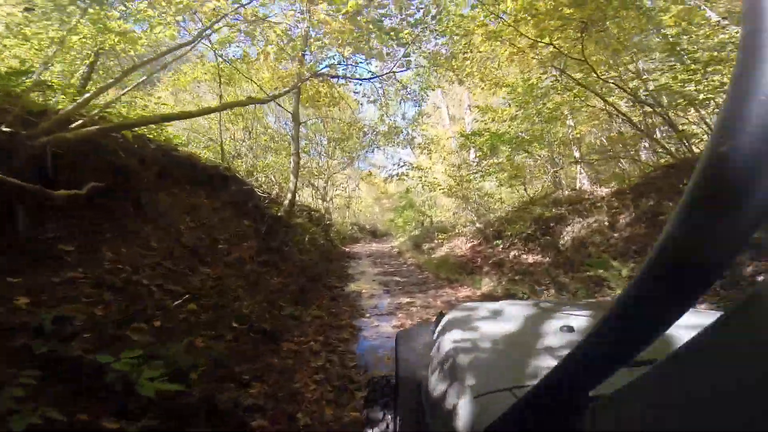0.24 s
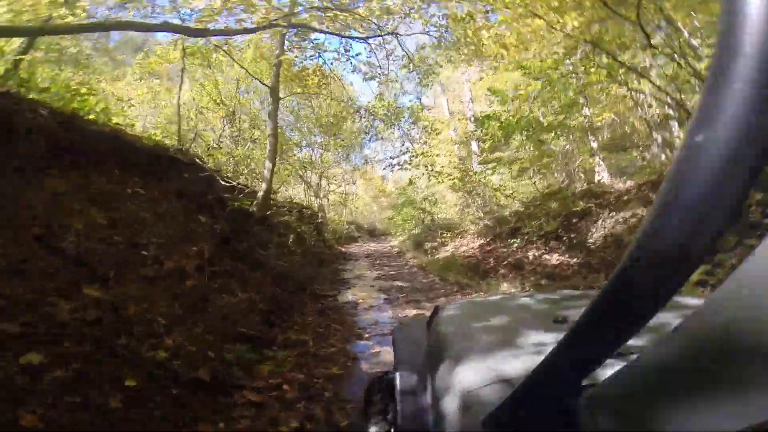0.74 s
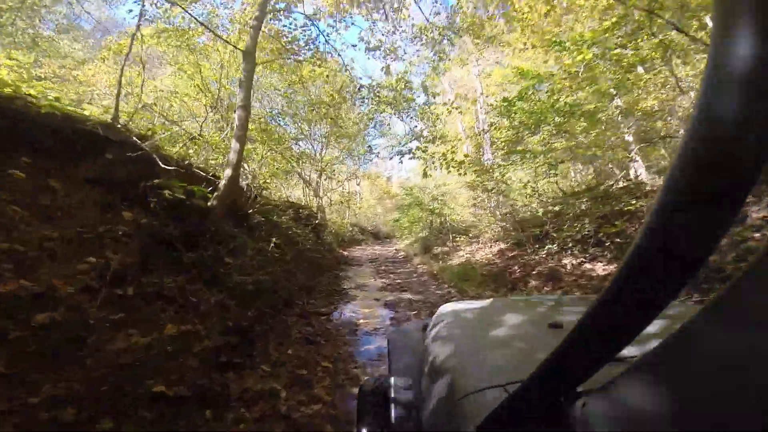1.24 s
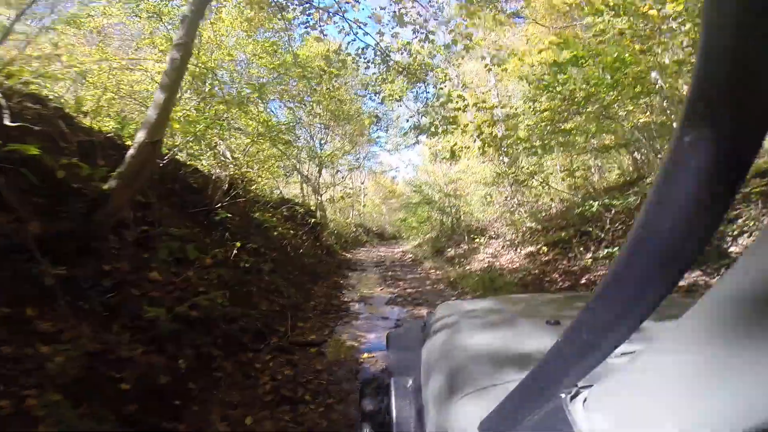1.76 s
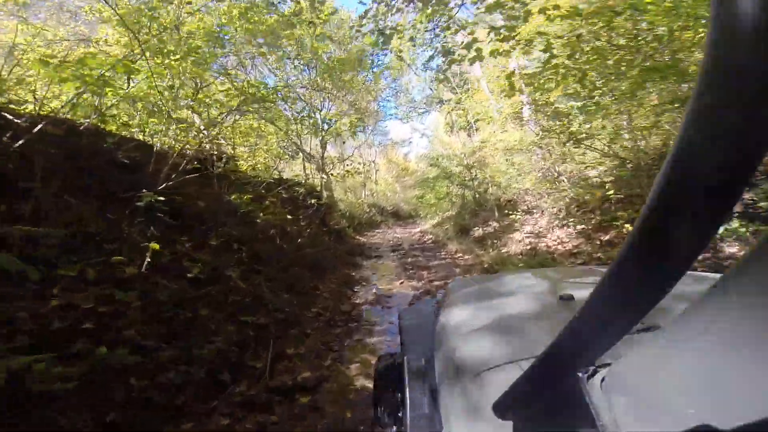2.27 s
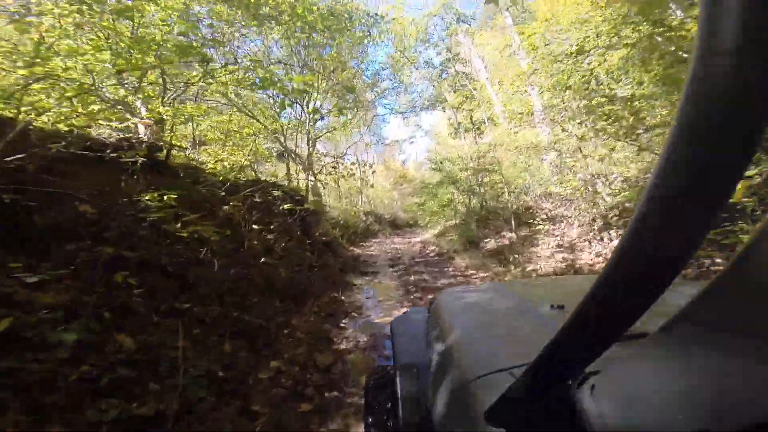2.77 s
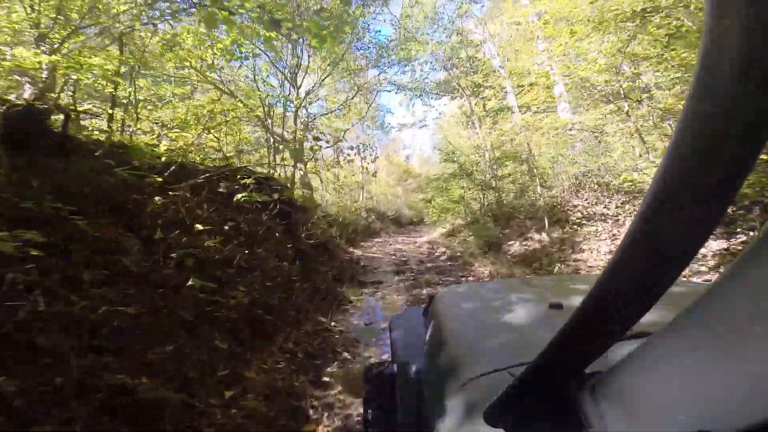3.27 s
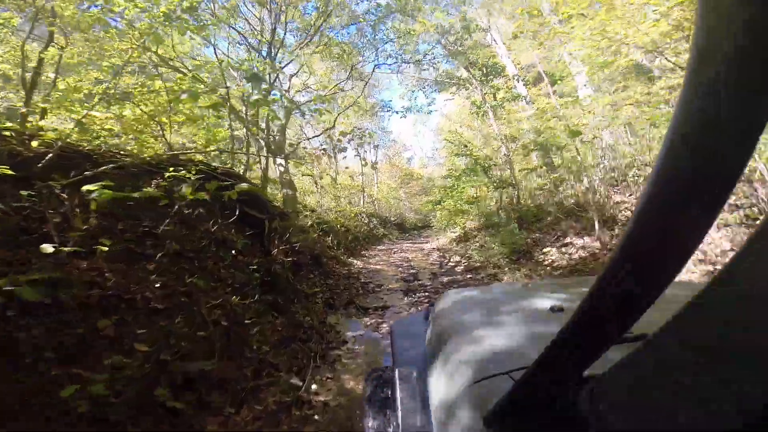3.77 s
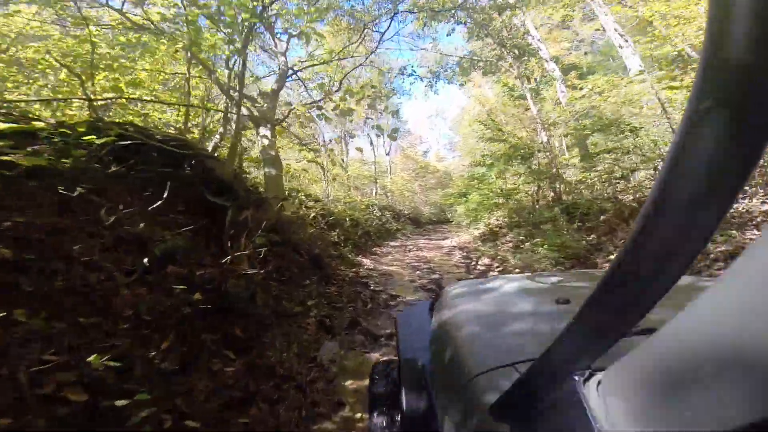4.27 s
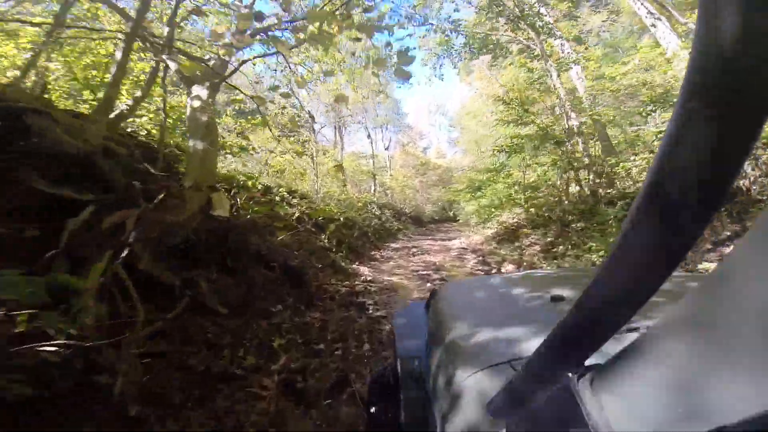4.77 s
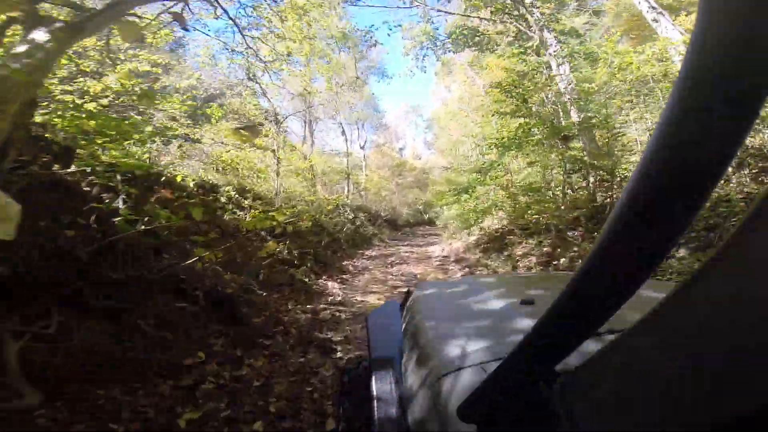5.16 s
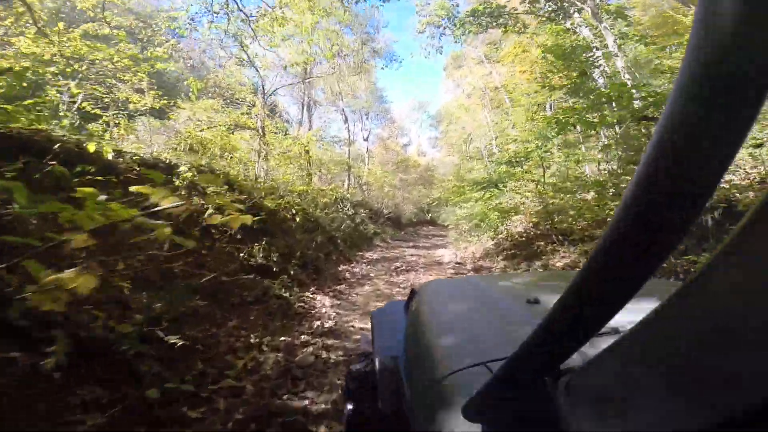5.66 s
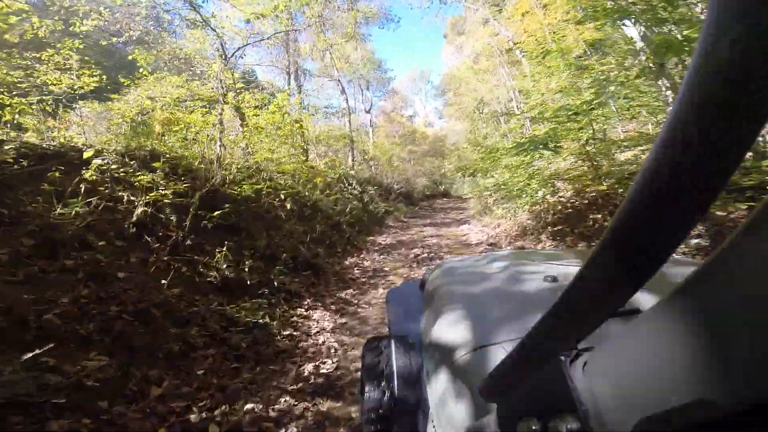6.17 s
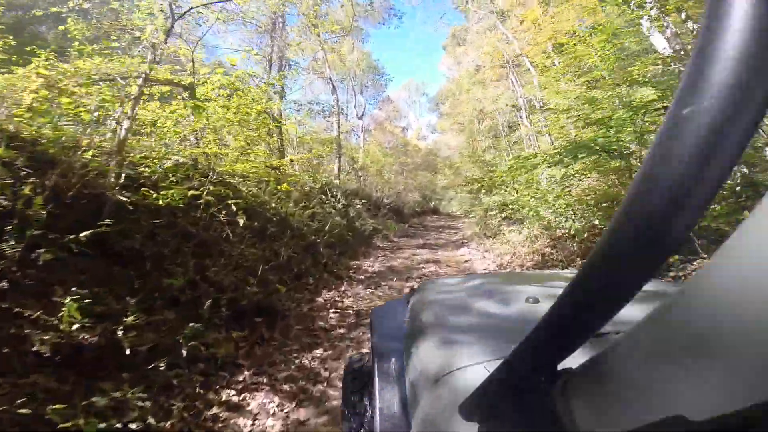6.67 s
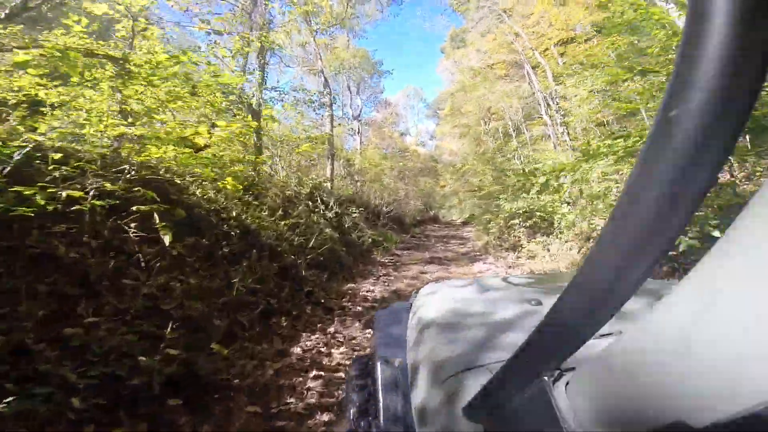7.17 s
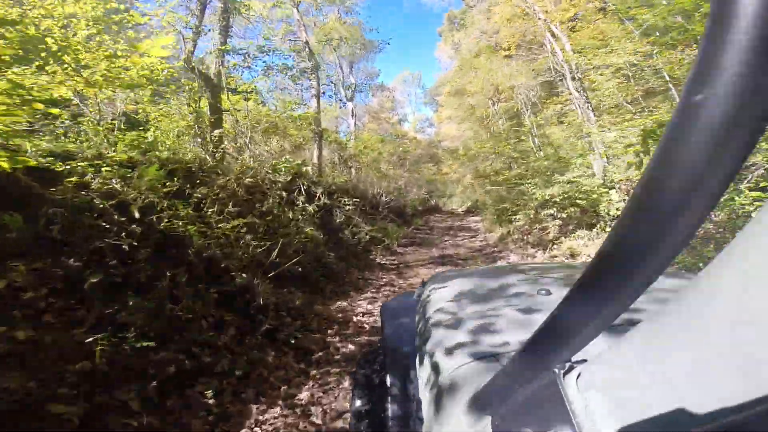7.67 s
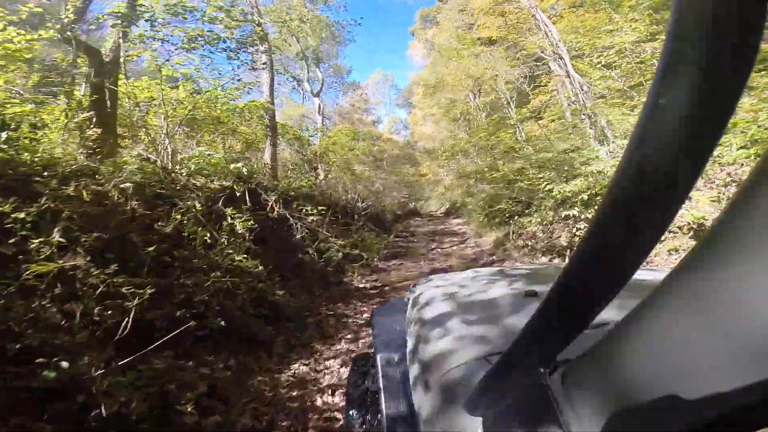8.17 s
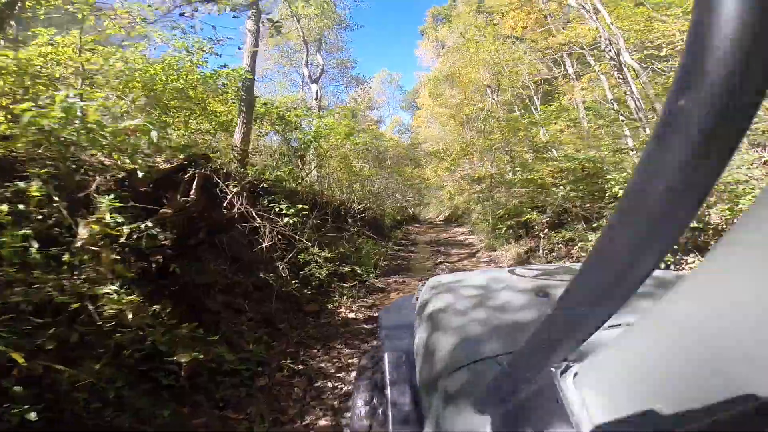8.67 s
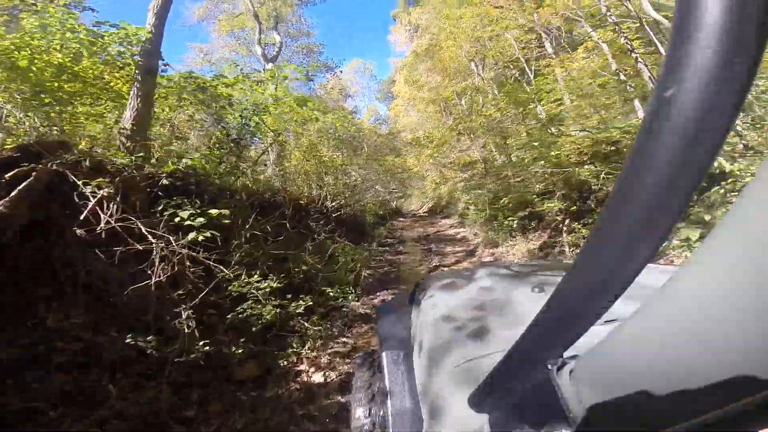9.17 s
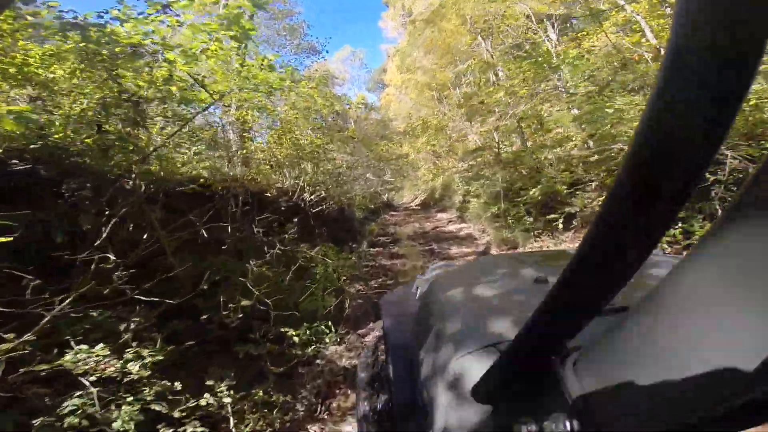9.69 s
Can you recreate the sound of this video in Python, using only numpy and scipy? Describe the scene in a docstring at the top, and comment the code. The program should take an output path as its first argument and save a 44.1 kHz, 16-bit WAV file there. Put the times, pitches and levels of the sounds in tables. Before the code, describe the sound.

Close, muffled outdoor sound from a case bolted on a slow vehicle. Quiet leaf rustle and low engine throb at first, an early stick snap, clusters of small hollow ticks, then stronger rolling crackle and chassis rumble. Two twig strikes just after five seconds are by far the loudest. Later come bumps, wet pops, faint thin metal rings and more crunching over steady faint hiss.

```python
"""Off-road vehicle on a muddy woodland trail

A four-wheel-drive vehicle crawls along, heard by a cased camera bolted to its body. Low engine orders hum,
a faint higher order shows briefly, the mount swings and shakes in noise bands. Tyres hiss and crunch as shaped
noise over mud and wet leaves; pops are short rising tones, snaps ringing modes. The case ticks, twigs strike it
as pushes and brief rings, a loose metal part rings thinly under noise rubs, over a steady microphone hiss."""
import sys
import numpy as np
from scipy import signal
from scipy.fft import rfft, irfft
from scipy.io import wavfile
from scipy.ndimage import uniform_filter1d

SR = 44100
rng = np.random.default_rng(int(sys.argv[2]) if len(sys.argv) > 2 else 0)


def pcm_store(signal):
    """Save signal as 16-bit PCM."""
    levels = np.round(np.clip(np.atleast_2d(signal), -1, 1) * 32767)
    wavfile.write(sys.argv[1], SR, levels.astype(np.int16).T)


N = 437913

# tyres rolling on wet leaves: (time [s], level [dB])
ROLLING = [(0.0, -54.5), (.6, -52.5), (2.16, -47), (3.59, -47), (4.06, -45), (4.42, -48.5), (5.25, -46),
           (5.97, -50.5), (6.44, -46.5), (6.72, -50), (7.11, -46), (7.69, -50), (7.88, -46.5),
           (9.62, -46.5), (9.93, -45)]
# outside sound as it passes the case: (frequency [Hz], relative level [dB])
CASE = [(150, 0), (400, -4), (650, -5), (1090, -3), (1380, 0), (1770, -1), (2070, -7), (2700, 3),
        (3100, -5.5), (3600, -14), (4500, -12), (6500, -16.5), (9000, -29.5), (12000, -35.5), (15500, -47)]


def gain_of(db):
    """dB to amplitude gain; gain_of(2 * db) is power."""
    return 10 ** (np.asarray(db) / 20)


def evened(x):
    """Scales to rms 1."""
    return x / np.sqrt(np.mean(x ** 2) + 1e-20)


def columns(rows):
    """Interpolates each value column of a time table to every sample."""
    time_s, *values = np.transpose(rows)
    return [np.interp(np.arange(N) / SR, time_s, value) for value in values]


def coloured(x, points):
    """Filters by a spectrum of (frequency [Hz], level [dB]) points."""
    point_hz, point_db = np.transpose(points)
    hz = np.fft.rfftfreq(len(x), 1 / SR)
    spectrum_db = np.interp(np.log(hz + 1), np.log(point_hz + 1), point_db)
    return irfft(rfft(x) * gain_of(spectrum_db), len(x))


def add(mix, start_s, sound):
    """Mixes a sound in at a time, cut at the end of the mix."""
    part = mix[round(start_s * SR):][:len(sound)]
    part += sound[:len(part)]


def drift(top_hz):
    """Slow random wander of rms 1: 24 sines over the three octaves up to top_hz."""
    t = np.arange(0, N, 256) / SR
    waves = sum(np.sin(2 * np.pi * (hz * t + rng.random())) / np.sqrt(hz)
                for hz in np.geomspace(top_hz / 8, top_hz, 24))
    return np.interp(np.arange(N) / SR, t, evened(waves))


def swells(rows, half_s):
    """Sums bell-shaped swells of power at (time [s], level [dB]); half_s is the 1/e half width."""
    t = np.arange(0, N, 128) / SR
    power = sum(gain_of(2 * db) * np.exp(-((t - s) / half_s) ** 2) for s, db in rows)
    return np.interp(np.arange(N) / SR, t, power)


def engine():
    """Low orders of the firing rate, wavering in common pitch and separate levels."""
    # (time [s], firing rate [Hz], level [dB])
    engine_curve = [(0, 45.24, -38.5), (.7, 40.1, -28.5), (.9, 37.4, -33), (1.1, 35.1, -28),
                    (1.5, 36.6, -36), (1.65, 38.2, -49), (1.8, 40.08, -29), (2.3, 38.9, -31.5),
                    (2.45, 39.73, -34), (2.9, 38.9, -28.5), (3.2, 40.06, -39.5), (3.7, 40.73, -33),
                    (4, 39.06, -45), (4.3, 42.8, -32.5), (4.7, 40.95, -38), (5.3, 40.05, -38.5),
                    (5.8, 39.02, -33), (6.1, 38.9, -40), (6.3, 39.06, -28.5), (6.9, 39.97, -37),
                    (7.2, 40.96, -41), (7.55, 40, -29), (8.5, 39.97, -32.5), (9.1, 40.96, -26.5),
                    (9.3, 40.04, -40), (9.5, 39.96, -32), (9.93, 39, -32.5)]
    # (multiple of the firing rate, relative level [dB])
    orders = [(1, -3), (1.5, -16.5)]
    firing_hz, level_db = columns(engine_curve)
    turns = np.cumsum(firing_hz * (1 + 0.022 * drift(11))) / SR
    out = np.zeros(N)
    for multiple, order_db in orders:
        gain = np.sqrt(2) * gain_of(level_db + order_db + 2.5 * drift(10))
        out += gain * np.sin(2 * np.pi * (multiple * turns + rng.random()))
    return out


def higher_engine_orders():
    """Faint third or fourth order of the firing rate, heard briefly as a sine that swells and fades."""
    # (start [s], length [s], from [Hz], to [Hz], level at mid-length [dB])
    order_lines = [(.05, 0.49, 140.9, 121.3, -61), (.9, 0.6, 141, 142, -56.5)]
    out = np.zeros(N)
    for s, length_s, from_hz, to_hz, db in order_lines:
        u = np.arange(0, 1, 1 / (length_s * SR))
        turns = np.cumsum(from_hz + (to_hz - from_hz) * u) / SR
        add(out, s, gain_of(db) * np.sqrt(2 * np.sin(np.pi * u)) * np.sin(2 * np.pi * turns))
    return out


def mount():
    """Two bracket modes beat in a wide sway; trail and bumps rumble in the chassis and thud above it."""
    # mount swinging on its bracket: (time [s], swing rate [Hz], level [dB])
    swing_curve = [(0, 15, -36), (.4, 17.1, -30.5), (.72, 14.9, -43), (1.35, 12.5, -29), (1.55, 17, -36.5),
                   (2.1, 14, -22.5), (2.46, 15.5, -33), (2.9, 15.5, -21), (3.15, 17, -35.5),
                   (3.45, 15.4, -24.5), (3.65, 15, -29.5), (3.9, 18.9, -24), (4.25, 17.7, -23.5),
                   (4.51, 16.1, -30.5), (4.98, 17.1, -22), (5.34, 15, -37.5), (5.45, 14.6, -19),
                   (5.67, 17, -25.5), (5.95, 18, -17), (6.25, 16, -32), (6.44, 18.2, -20), (6.64, 17, -32),
                   (6.92, 14, -26), (7.44, 14.9, -29), (7.9, 17.9, -23), (8.3, 19.3, -32.5),
                   (8.7, 18.8, -25), (8.95, 15, -33.5), (9.09, 15, -24), (9.26, 15, -36.5),
                   (9.45, 17.6, -19.5), (9.93, 18, -32.5)]
    # trail roughness felt in the chassis: (time [s], rumble level [dB], thud level [dB])
    trail = [(0, -56, -48.5), (.8, -47, -55), (1.3, -49, -52), (2, -52, -49), (2.4, -45.5, -54.5),
             (4.8, -39, -53), (5.2, -37, -51), (6.4, -40.5, -48), (6.8, -40.5, -51), (7.1, -40, -53),
             (9.93, -41, -50.5)]
    # single bumps under the wheels: (peak time [s], rumble level [dB], thud level [dB])
    bumps = [(.86, -43, -42.5), (1.36, -46, -48), (3.4, -44, -59), (3.62, -36, -52), (3.84, -30, -43.5),
             (4.03, -33, -48.5), (4.47, -37, -62), (5.45, -35.5, -43.5), (5.608, -30, -54),
             (5.84, -32.5, -45.5), (6.03, -41, -42.5), (6.42, -22.5, -46), (6.61, -38, -60),
             (8.03, -41, -47), (8.5, -33, -64), (8.68, -33, -48.5), (8.89, -53, -43.5), (9.33, -33, -53),
             (9.62, -31, -45)]
    # spectra of sway, chassis rumble and thud: (frequency [Hz], relative level [dB])
    sway_colour = [(2, -6), (8, 9), (29, 8.5), (38, 2), (50, 5), (80, -54), (400, -92)]
    chassis_colour = [(30, -4), (48, 1.5), (66, 4), (90, -7.5), (115, -19), (200, -75), (800, -90)]
    thud_colour = [(60, -5.5), (95, 0.5), (160, -5), (300, -17.5), (600, -26.5), (1200, -29.5), (4000, -84)]
    upper_ratio, upper_db = 1.26, -9  # second bracket mode relative to the first
    sway_db, swing_ref_db, sway_follows = -32, -25, 0.48  # sway level at the reference swing; dB per dB
    bump_half_s, thud_half_s = 0.018, 0.027

    swing_hz, swing_db = columns(swing_curve)
    swing = np.zeros(N)
    for ratio, mode_db in ((1, 0), (upper_ratio, upper_db)):
        gain = np.sqrt(2) * gain_of(swing_db + mode_db + 2.0 * drift(41))
        turns = np.cumsum(ratio * swing_hz * (1 + 0.0568 * drift(3.0))) / SR
        swing += gain * np.sin(2 * np.pi * (turns + rng.random()))

    sway, rumble, thud = (evened(coloured(rng.standard_normal(N) * gain_of(1.16 * drift(23)), colour))
                          for colour in (sway_colour, chassis_colour, thud_colour))
    sway *= gain_of(sway_db + sway_follows * (swing_db - swing_ref_db))
    rumble_db, thud_db = columns(trail)
    bump_s, bump_rumble_db, bump_thud_db = np.transpose(bumps)
    rumble *= np.sqrt(gain_of(2 * rumble_db) + swells(zip(bump_s, bump_rumble_db), bump_half_s))
    thud *= np.sqrt(gain_of(2 * thud_db) + swells(zip(bump_s, bump_thud_db), thud_half_s))
    return swing + sway + rumble + thud


def tyres():
    """Rolling hiss of random short-time spectra; crunches rise fast and fade; small cracks fall at random."""
    # leaves and sticks crushed: (time [s], level [dB], brightness [dB per octave], t60 [s])
    crunches = [(0.0792, -51, 7, 0.16), (0.1775, -46.5, 6.5, 0.27), (.5536, -46, 4, .08),
                (0.638, -42, 6.5, 0.25), (0.967, -42, 5, 0.27), (1.196, -42.5, 5, 0.36),
                (1.6784, -46, 5, 0.18), (1.9614, -45.5, 6.5, 0.26), (2.1021, -43, 6, 0.36),
                (2.568, -45.5, 4.5, 0.52), (2.8523, -45, 3.5, 0.26), (3.1012, -42.5, 3, 0.2),
                (3.2392, -45.5, 5, 0.26), (3.474, -44, 4.5, 0.3), (3.6671, -40, 5.5, 0.25),
                (4.032, -42, 3.5, 0.3), (4.1107, -41.5, 2, 0.16), (4.2753, -42, 2, 0.29),
                (4.5053, -41.5, 5.5, 0.26), (4.74, -44, 2, 0.32), (4.8806, -41.5, 4, 0.33),
                (5.0055, -38.5, 4.5, 0.046), (5.1658, -33.5, 3, 0.19), (5.1844, -35, 3, 0.16),
                (5.3492, -42, 6, 0.2), (5.394, -40, 3, .15), (5.4525, -41, 3, 0.13),
                (5.8107, -40.5, 3, 0.16), (5.8619, -45, 2, 0.18), (5.948, -41.5, 3, 0.081),
                (6.335, -42, 1.5, 0.19), (6.4975, -50, 1, 0.12), (6.6616, -47, -2, 0.081),
                (6.808, -43.5, 3.5, 0.3), (6.975, -51, 7, 0.21), (7.185, -38.5, 2.5, 0.17),
                (7.2654, -53, 8, 0.21), (7.4003, -39, 3.5, 0.089), (7.5082, -40.5, 3, 0.13),
                (7.6575, -42, 4, 0.3), (7.801, -38, 3.5, 0.22), (7.887, -44, 5, 0.091),
                (7.955, -42.5, 3.5, 0.24), (8.147, -45, 1.5, 0.1), (8.8407, -46.5, 6, 0.15),
                (9.0905, -42.5, 5, 0.19), (9.359, -43.5, 0, 0.2), (9.6556, -39.5, 4.5, 0.41)]
    neutral_db, brighter = -51, 0.36  # louder rolling is brighter: dB per octave per dB above neutral
    crunch_rise_s = 0.015
    hop, window = 64, 256
    frames, hz = N // hop + 5, np.fft.rfftfreq(window, 1 / SR)
    t = np.arange(frames) * hop / SR
    octaves = np.log2((hz[:, None] + 300) / 2700)  # zero at 2400 Hz, compressed in the bass

    level_db = np.interp(t, *np.transpose(ROLLING))
    power = gain_of(2 * (level_db + brighter * (level_db - neutral_db) * octaves))
    for s, crunch_db, bright, t60_s in crunches:
        age_s = t - s
        rise = np.clip(age_s / crunch_rise_s + .5, 0, 1) ** 2
        fade = gain_of(-120 * np.clip(age_s, 0, 1) / t60_s)  # power
        power = power + rise * fade * gain_of(2 * (crunch_db + bright * octaves))

    cracks = (rng.random(frames) < .045) * gain_of(8.0 * np.minimum(rng.exponential(1, frames), 2.3))
    crack_power = signal.lfilter([1], [1, -.85], cracks)  # each dies in some 10 ms
    power = power * (1 + 0.37 * gain_of(-2 * octaves ** 2) * crack_power)

    real, imag, patches = rng.standard_normal((frames, 129, 3)).T
    noise = real + 1j * imag
    patches = evened(uniform_filter1d(uniform_filter1d(patches, 16, 1), 4, 0))  # uneven in time and pitch
    case_hz, case_db = np.transpose(CASE)
    case_gain = gain_of(np.interp(np.log(hz + 1), np.log(case_hz), case_db))[:, None]
    overlap = window - hop
    unit_rms = signal.istft(noise * case_gain, nperseg=window, noverlap=overlap)[1].std()
    spectra = noise * np.sqrt(power) * gain_of((1.42 + 0.44 * octaves) * patches)
    outside = signal.istft(spectra, nperseg=window, noverlap=overlap)[1][:N]
    return coloured(outside, CASE) / unit_rms


def pops():
    """Small air pockets burst in the mud: a few cycles each, rising a little in pitch."""
    # the clearest pops: (time [s], peak level [dB], starting pitch [Hz])
    clear_pops = [(1.457, -45, 800), (1.525, -47, 744), (2.567, -35, 2700), (2.705, -37, 2865),
                  (3.157, -45.5, 790), (4.567, -37, 2762), (4.65, -38, 2693), (4.708, -36, 1288),
                  (4.763, -37, 2850), (6.402, -34, 2800), (6.817, -36, 1425), (7.227, -40, 1503),
                  (7.789, -36, 2713), (7.805, -28, 2280), (7.811, -31, 2543), (7.94, -39, 1399),
                  (8.01, -38, 2602), (8.113, -36, 1623), (9.658, -35, 2630), (9.672, -34, 2636),
                  (9.7, -35, 2570)]
    pops_per_s, over_rolling_db = 58, 2  # the small, random pops
    span_cycles, rise = 9.3, 0.085  # swell peaks at a quarter of the span
    out, draws = np.zeros(N), rng.random((int(pops_per_s * N / SR), 3))
    small_s = draws[:, 0] * N / SR
    small_hz = 700 * 10 ** draws[:, 2]
    small_db = over_rolling_db + np.interp(small_s, *np.transpose(ROLLING))
    small_db -= 1.1 * np.log(draws[:, 1] + 0.059)  # a few stand out
    small_db += np.interp(small_hz, *np.transpose(CASE))
    for s, db, hz in [*clear_pops, *zip(small_s, small_db, small_hz)]:
        turns = np.arange(0, 3 * span_cycles, hz / SR)
        u = turns / span_cycles
        swell = 4 * u * np.exp(1 - 4 * u)
        add(out, s, gain_of(db) * swell * np.sin(2 * np.pi * turns * (1 + rise * u)))
    return out


def snaps():
    """A stick gives in a few quick breaks that ring short modes."""
    # sticks breaking: (time [s], first break level [dB], extra low mode level [dB])
    breaking_sticks = [(0.0793, -50, -12), (0.6363, -33.5, 5.5), (0.6397, -37.5, -6), (.647, -43.5, -10),
                       (0.968, -53, -3), (2.5676, -47, -8), (2.912, -50, 14), (3.6682, -44.5, 11),
                       (4.5046, -38, -13), (7.4027, -48, -1)]
    # stick modes: (frequency [Hz], t60 [s], relative level [dB])
    stick_modes = [(1350, 0.022, 0.5), (2360, 0.025, -2), (2700, 0.028, 4.5), (2930, 0.04, -4.5),
                   (3240, 0.018, -1.5), (4590, 0.025, 0), (5200, 0.016, -6.5), (9000, 0.019, -10.5)]
    out, t = np.zeros(N), np.arange(2200) / SR
    for s, db, low_db in breaking_sticks:
        breaks = rng.uniform(-0.68, 0.39, 130) * (rng.random(130) < .07) * np.exp(-np.arange(130) / 90)
        breaks[0] = 1
        ring = sum(gain_of(mode_db + low_db * (hz < 2000) - 60 * t / t60_s) * np.sin(2 * np.pi * hz * t)
                   for hz, t60_s, mode_db in stick_modes)
        onset = 1 - np.exp(-t / .0003)
        add(out, s, gain_of(db) * np.convolve(breaks, ring * onset))
    return out


def ticks_and_double_blow():
    """Case ticks and one hard double blow: a quick cycle rings the case, then a slow push as it rocks back."""
    # case ticks and, at 5.22 s, a hard double blow of a twig on the case:
    # (time [s], cycle level [dB], nominal cycle pitch [Hz], low push level [dB])
    contacts = [(.42, -30.5, 1110, -40), (1.282, -30.5, 1110, -31), (1.353, -35, 905, -29),
                (1.488, -26, 1200, -28), (1.537, -22, 1374, -21.5), (1.715, -25.5, 1250, -36),
                (1.886, -29, 1194, -25), (1.918, -27, 1200, -20), (1.94, -34, 1000, -30),
                (2.065, -25.5, 1058, -30), (2.164, -31.5, 892, -35), (2.858, -35, 1100, -47),
                (2.886, -37, 1204, -41), (2.911, -40, 1305, -44), (3.097, -35, 1090, -45),
                (3.441, -34.5, 1103, -44), (4.787, -34, 1302, -40), (5.2162, -13, 1690, -47),
                (5.2187, -5, 1580, -11), (5.9207, -28.5, 1600, -23), (6.163, -27.5, 1300, -22.5),
                (6.235, -35, 900, -22), (6.308, -20, 1112, -15.5), (6.846, -34, 1098, -42),
                (7.83, -34, 1099, -34), (8.91, -42, 1196, -39), (9.142, -26, 1304, -22),
                (9.191, -31, 1400, -44), (9.599, -29, 1288, -41)]
    out, t = np.zeros(N), np.arange(-100, 900) / SR
    # lowest case mode, swelling with the contact
    ring = np.sin(2 * np.pi * 790 * (t - .0004)) * gain_of(-60 * np.where(t > 0, t / .012, -t / .005))
    high = np.sin(2 * np.pi * 2850 * t) * gain_of(-60 * t / 0.0095) * (t > 0)
    top = np.sin(2 * np.pi * 3700 * t) * gain_of(-60 * t / .007) * (t > 0)
    push = np.sin(2 * np.pi * 75 * (t - .0012)) * np.exp(-t / .008) * (t > .0012)
    for s, db, hz, push_db in contacts:
        cycle = -(t * hz * 3.35 + 0.11) * np.exp(.5 - .5 * (4.84 * hz * t) ** 2)
        knock = cycle + 0.23 * hz / 1900 * ring - 0.083 * high - 0.017 * top
        add(out, s, gain_of(db) * knock + gain_of(push_db) * push)
    return out


def twig():
    """A blow on the case pushes the microphone one way; the case rings briefly and swings back."""
    # (time [s], push level [dB], ring level [dB])
    blows = [(5.0475, -4.5, -12)]
    out, t = np.zeros(N), np.arange(2500) / SR
    push = (1 - np.exp(-(t / .0006) ** 3)) * (2.0 * np.exp(-t / .0015) - .27 * np.exp(-t / .008))
    modes = np.sin(2 * np.pi * 1670 * t)
    modes += .65 * np.sin(2 * np.pi * 2250 * (t + .00012))
    modes += .09 * np.sin(2 * np.pi * 3400 * t)
    ring = modes * np.exp(-t / .0013) * (1 - np.exp(-(t / .0005) ** 3))
    for s, push_db, ring_db in blows:
        add(out, s, -gain_of(push_db) * push - gain_of(ring_db) * ring)
    return out


def loose_metal():
    """Short rubs of noise drive the narrow modes of the part."""
    # (time [s], level [dB], extra level of the modes above 9 kHz [dB])
    rubs = [(0.14, -52, -8), (0.544, -52, -13), (0.62, -46, -12), (0.65, -57, -8), (0.962, -51, -8),
            (1.937, -51, -8), (2.5524, -48, -3), (2.774, -54, 0), (3.245, -52, 2), (3.829, -48, 2),
            (5.1714, -58, 0), (5.3284, -44, -11), (5.3578, -44, -12), (5.447, -55, -8), (5.656, -48.5, -15),
            (5.857, -54, 4), (5.8685, -40, -13), (5.89, -44, -9), (6.3962, -53, -12), (7.915, -55, -5),
            (8.076, -43, -11), (8.4335, -53, -4), (8.714, -51, -3)]
    # (frequency [Hz], bandwidth [Hz], relative level [dB])
    metal_modes = [(1660, 50, -10), (4670, 80, -14), (8240, 50, -5), (8560, 160, -19), (10150, 60, -19),
                   (11720, 70, -15), (12880, 60, -15), (14800, 90, -22)]
    rub_s = 0.021
    out, u = np.zeros(N), np.arange(6000) / SR / rub_s
    for s, db, top_db in rubs:
        rub = rng.standard_normal(len(u)) * np.sqrt(np.minimum(u / 0.13, 1)) * np.exp(-u ** 2)
        for hz, width_hz, mode_db in metal_modes:
            r = np.exp(-np.pi * width_hz / SR)  # pole radius
            pole = r * np.exp(2j * np.pi * hz / SR)
            ring = signal.lfilter([np.sqrt(1 - r * r)], [1, -pole], rub).real
            add(out, s, gain_of(db + mode_db + top_db * (hz > 9000)) * ring)
    return out


def scene():
    """All parts at one microphone."""
    vehicle = engine() + higher_engine_orders() + mount()
    ground = tyres() + pops() + snaps()
    case_and_metal = ticks_and_double_blow() + twig() + loose_metal()
    return (vehicle + ground + case_and_metal)[None]


def record(dry):
    """Steady hiss of the microphone, then the band limit."""
    # (frequency [Hz], relative level [dB])
    hiss_colour = [(1000, -17), (5000, 9), (10000, 1), (13000, -9), (15500, -5.5)]
    hiss_db, edge_hz = -61.5, 15200
    hiss = gain_of(hiss_db) * evened(coloured(rng.standard_normal(N), hiss_colour))
    lowpass = signal.firwin(1023, edge_hz, window=("kaiser", 10), fs=SR)
    return signal.oaconvolve(dry + hiss, lowpass[None], "same")


dry = scene()
out = record(dry)
pcm_store(out)
```